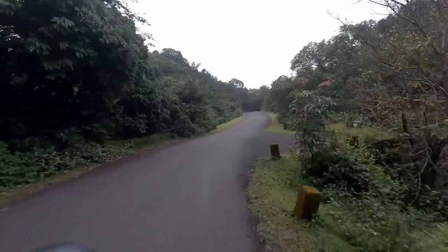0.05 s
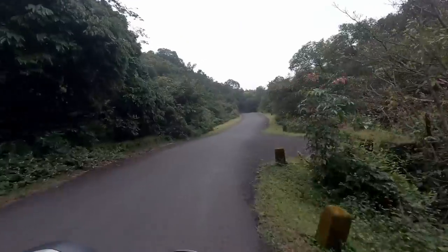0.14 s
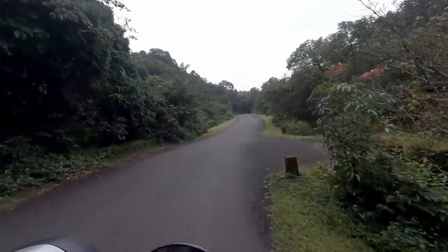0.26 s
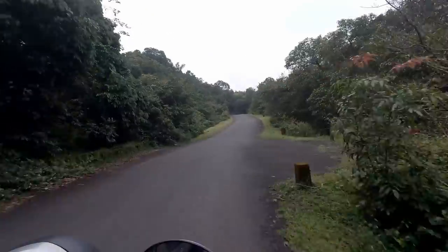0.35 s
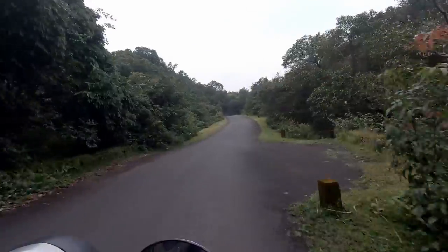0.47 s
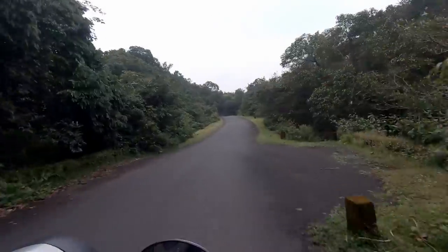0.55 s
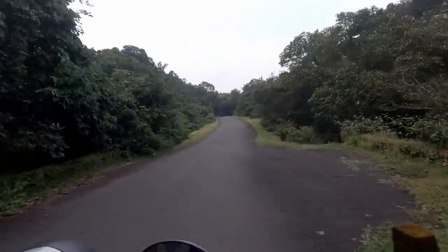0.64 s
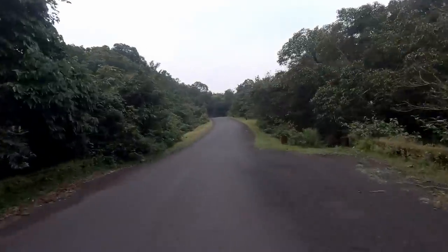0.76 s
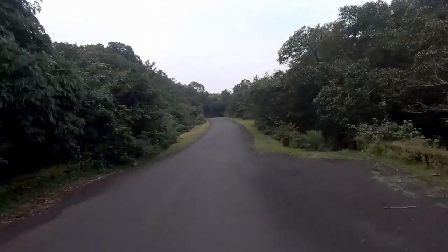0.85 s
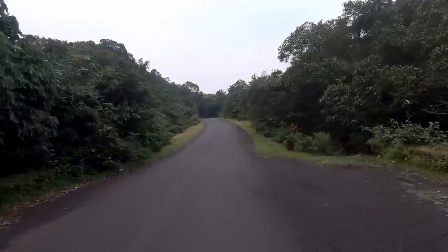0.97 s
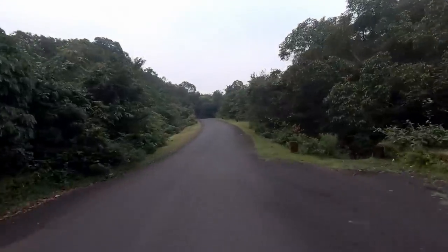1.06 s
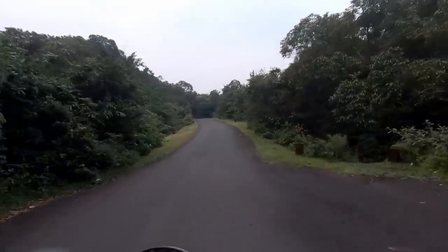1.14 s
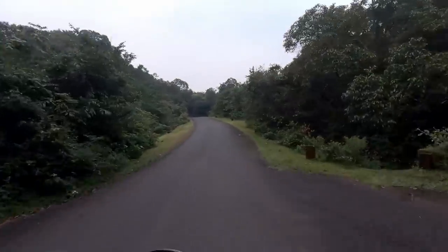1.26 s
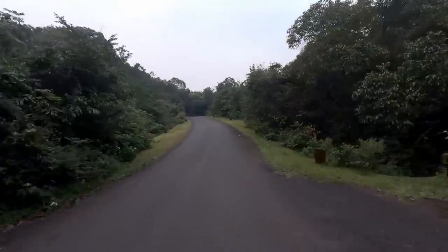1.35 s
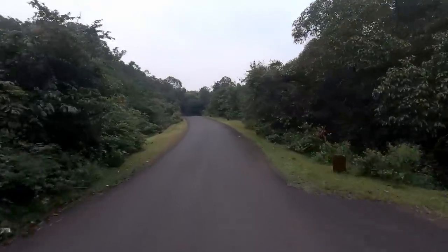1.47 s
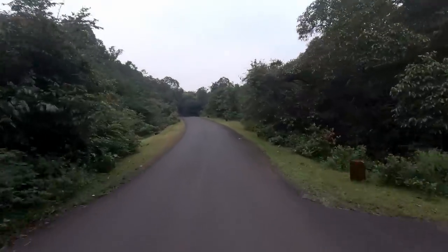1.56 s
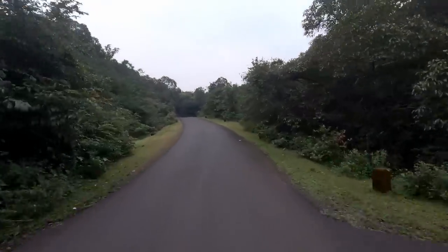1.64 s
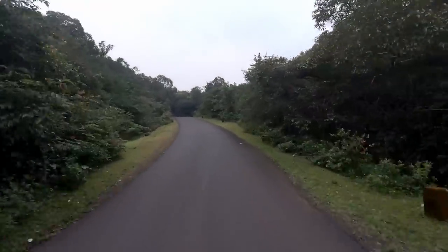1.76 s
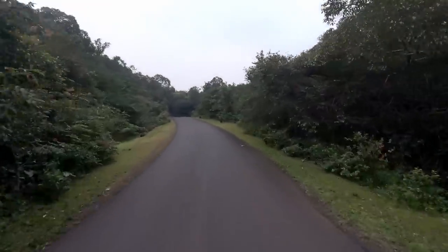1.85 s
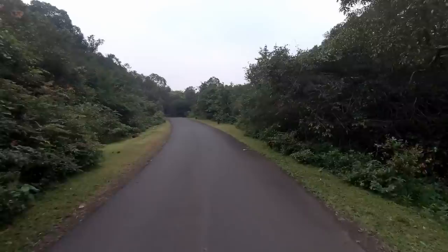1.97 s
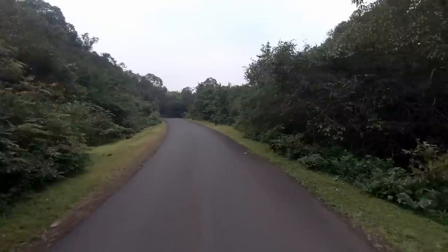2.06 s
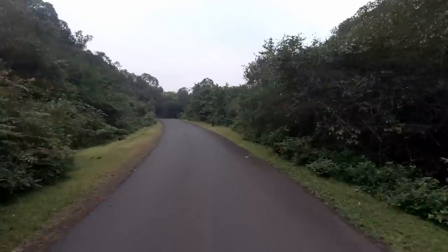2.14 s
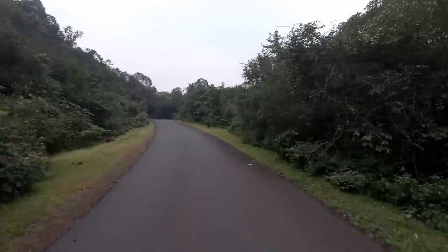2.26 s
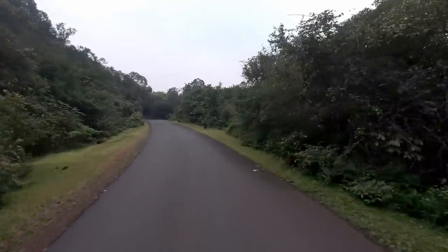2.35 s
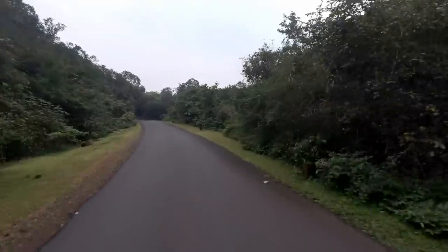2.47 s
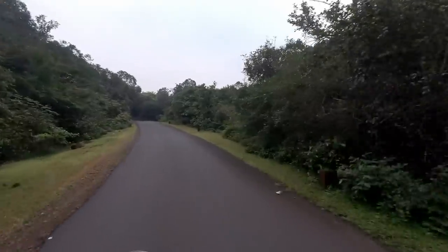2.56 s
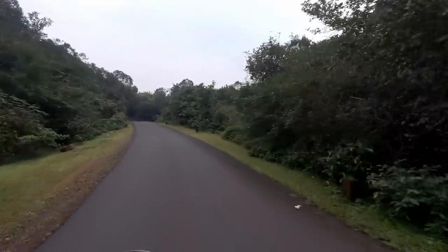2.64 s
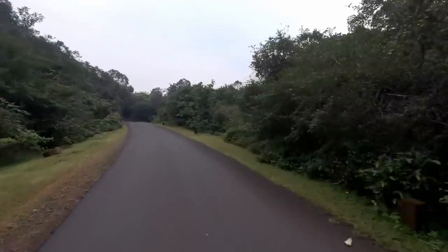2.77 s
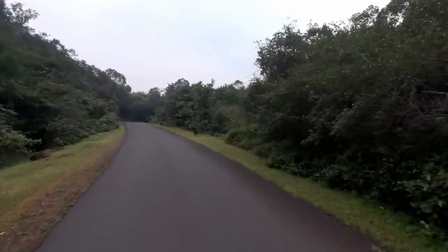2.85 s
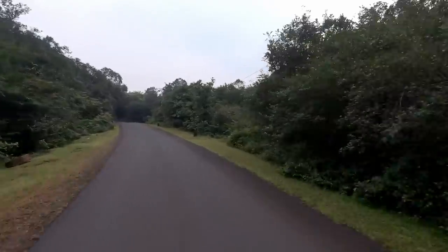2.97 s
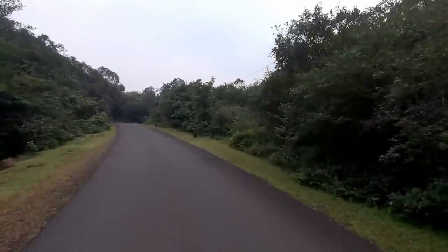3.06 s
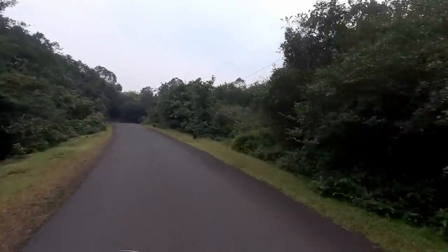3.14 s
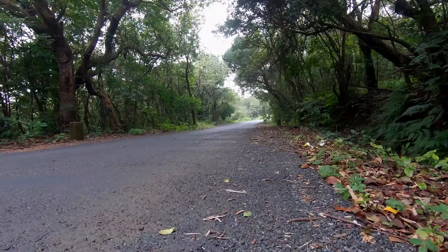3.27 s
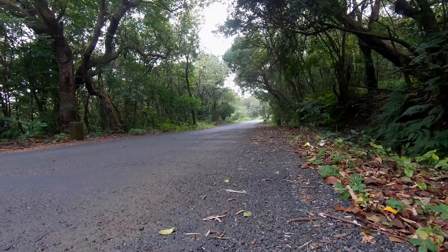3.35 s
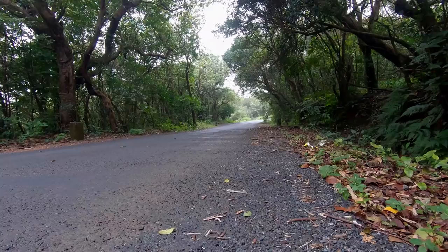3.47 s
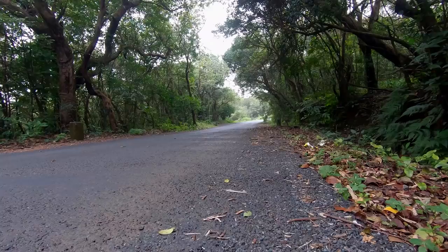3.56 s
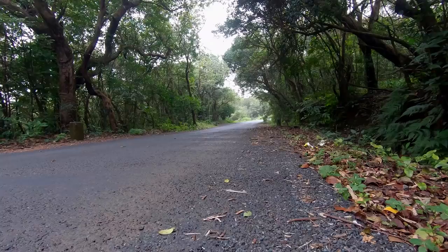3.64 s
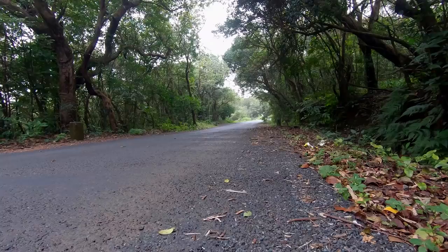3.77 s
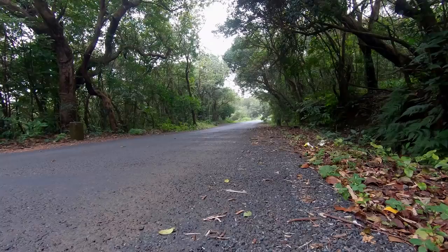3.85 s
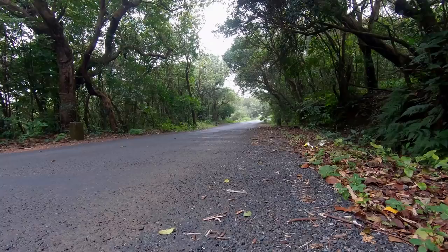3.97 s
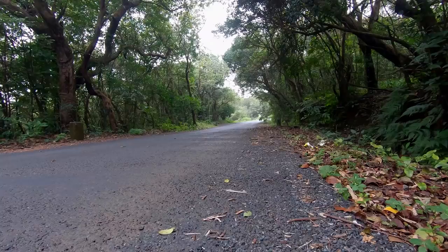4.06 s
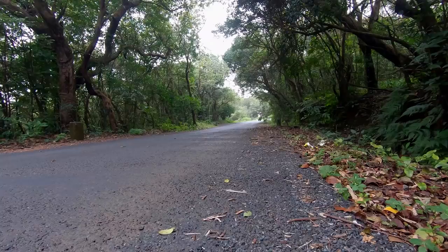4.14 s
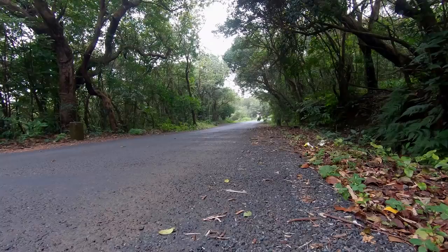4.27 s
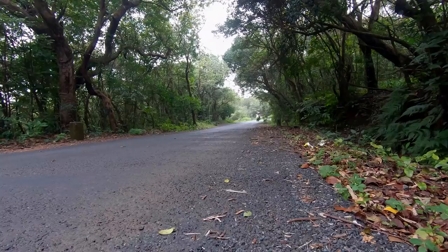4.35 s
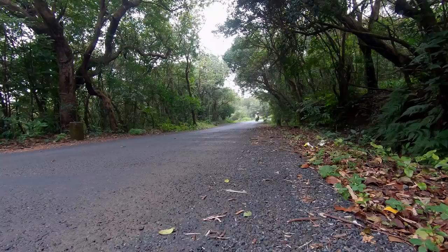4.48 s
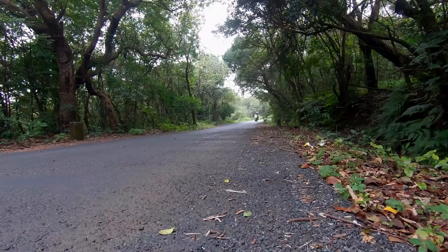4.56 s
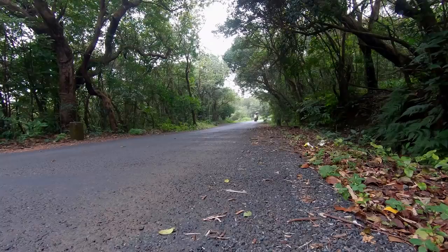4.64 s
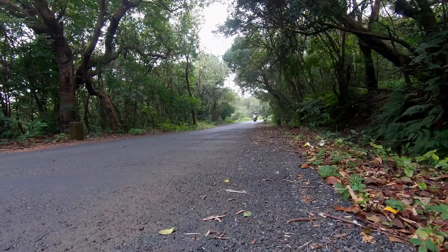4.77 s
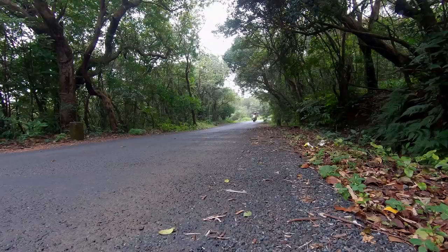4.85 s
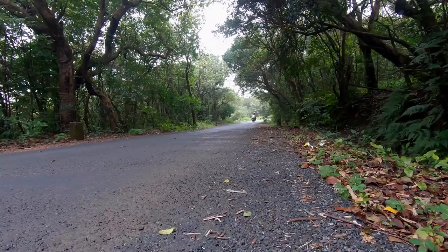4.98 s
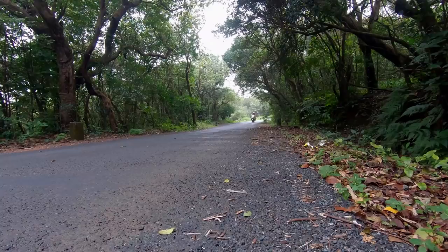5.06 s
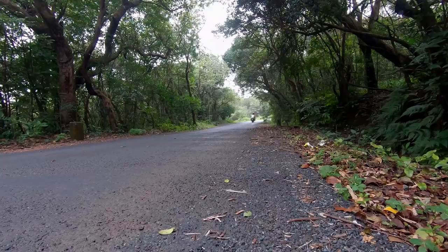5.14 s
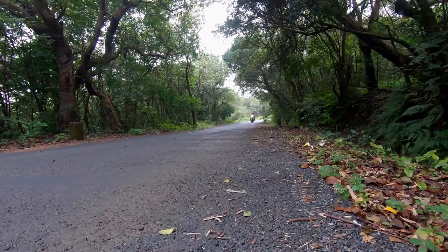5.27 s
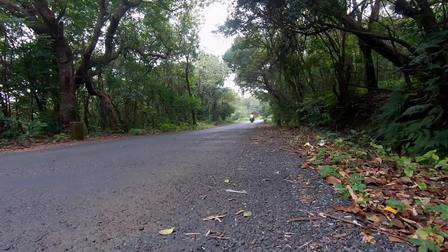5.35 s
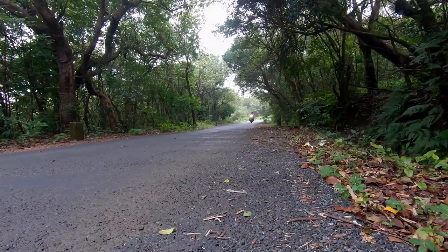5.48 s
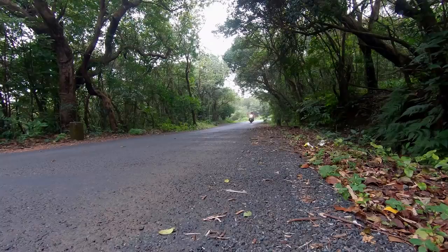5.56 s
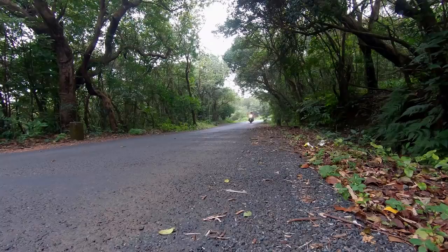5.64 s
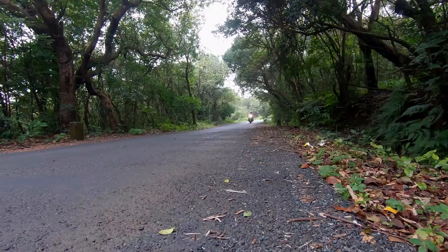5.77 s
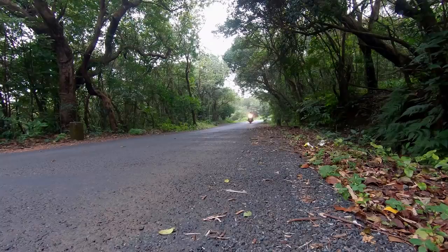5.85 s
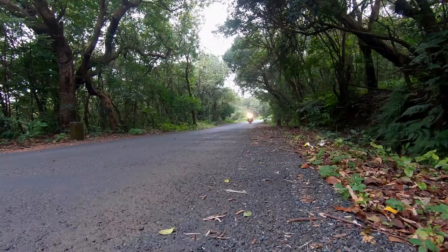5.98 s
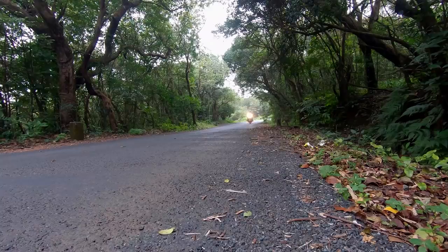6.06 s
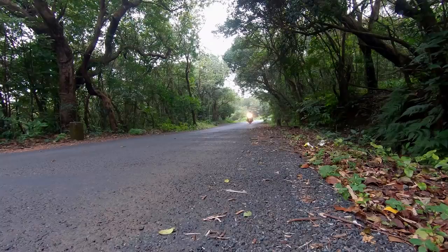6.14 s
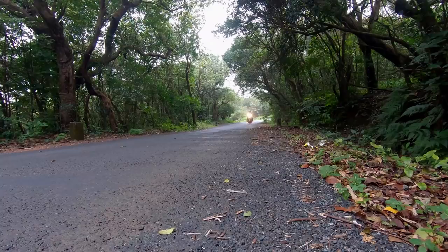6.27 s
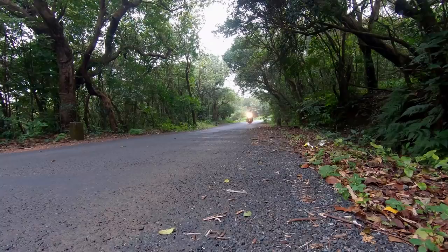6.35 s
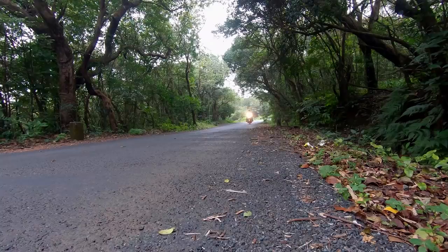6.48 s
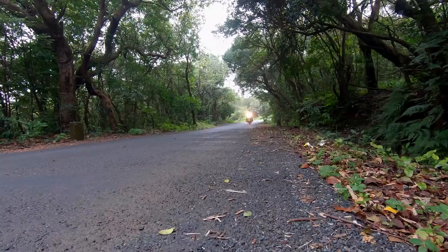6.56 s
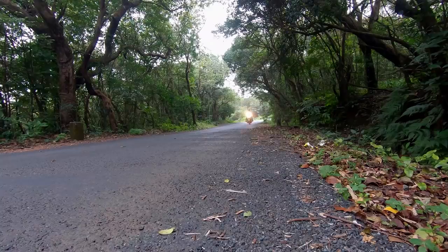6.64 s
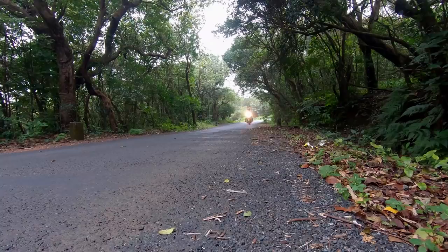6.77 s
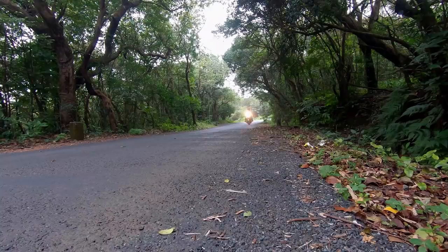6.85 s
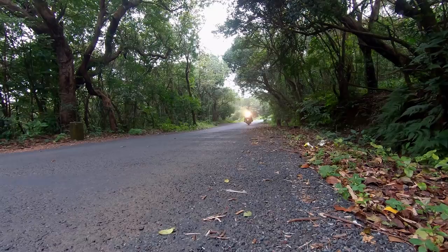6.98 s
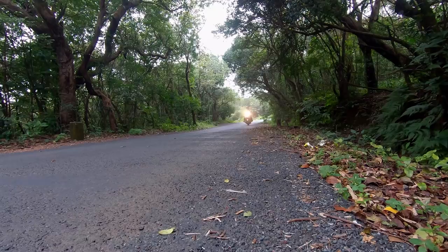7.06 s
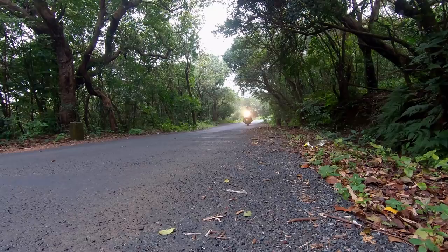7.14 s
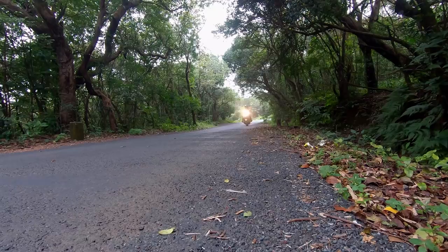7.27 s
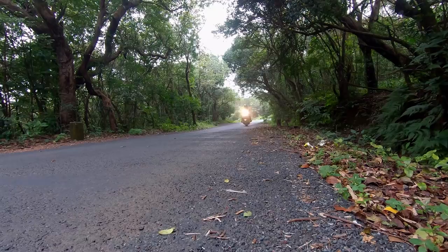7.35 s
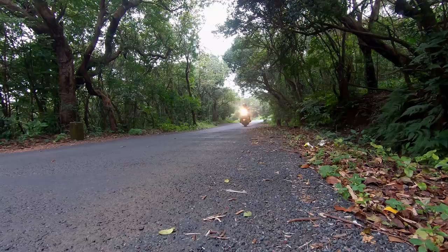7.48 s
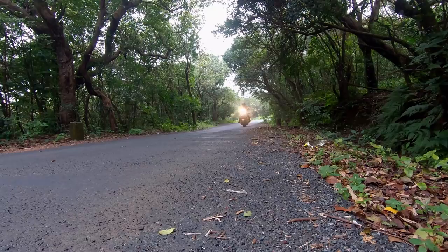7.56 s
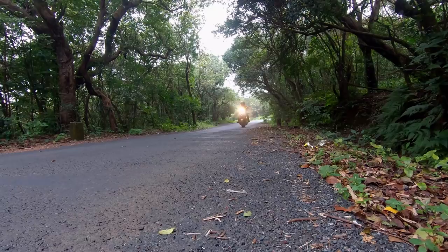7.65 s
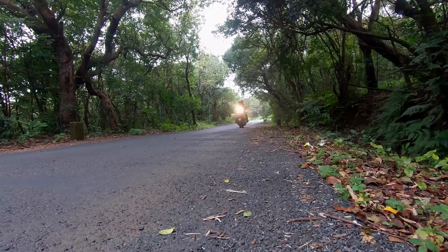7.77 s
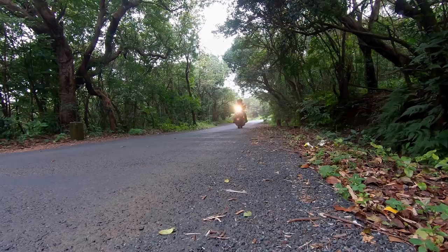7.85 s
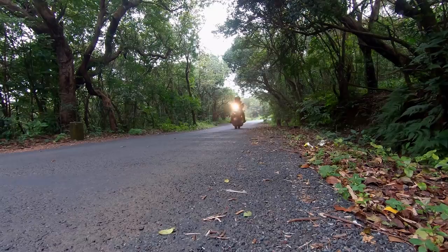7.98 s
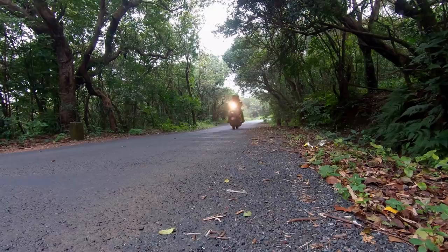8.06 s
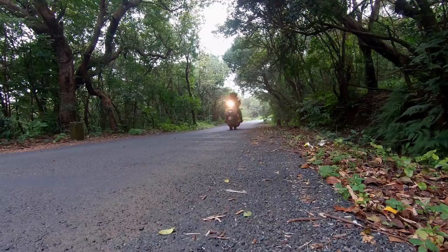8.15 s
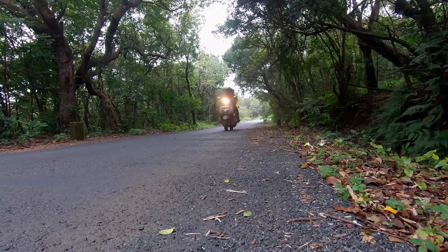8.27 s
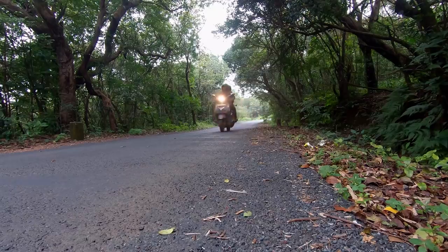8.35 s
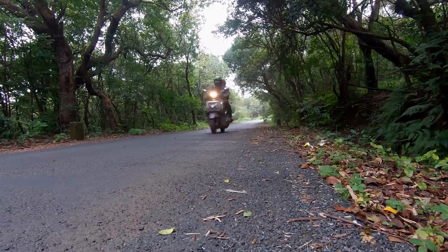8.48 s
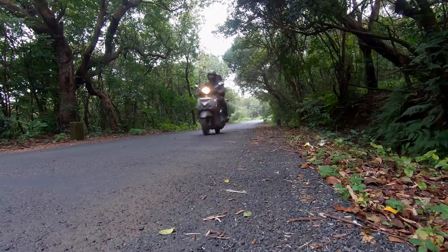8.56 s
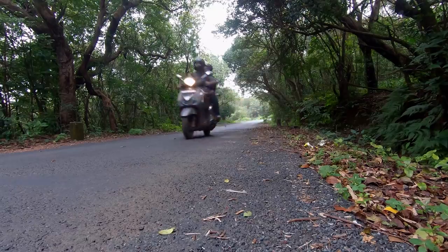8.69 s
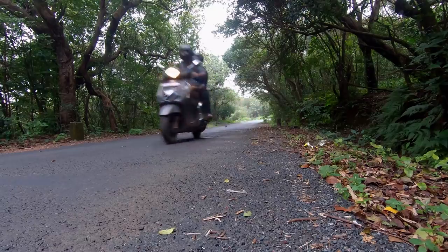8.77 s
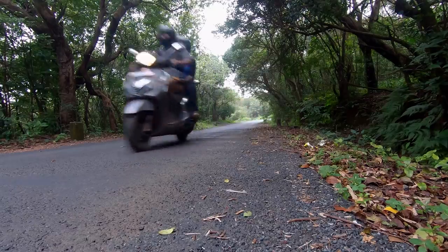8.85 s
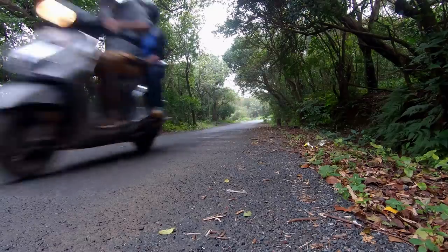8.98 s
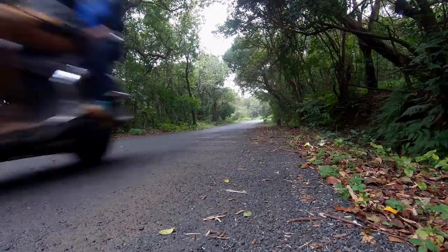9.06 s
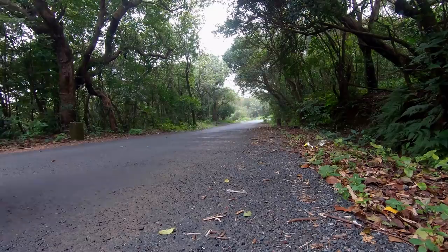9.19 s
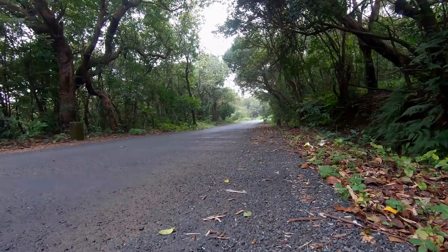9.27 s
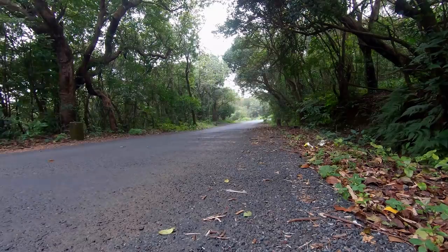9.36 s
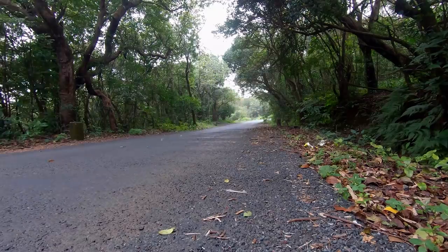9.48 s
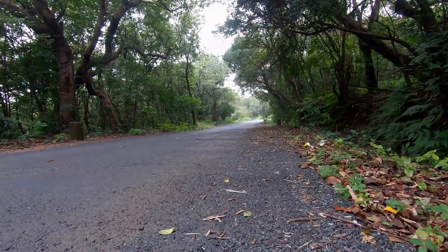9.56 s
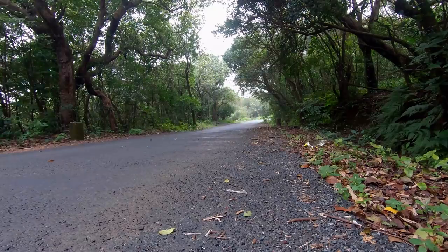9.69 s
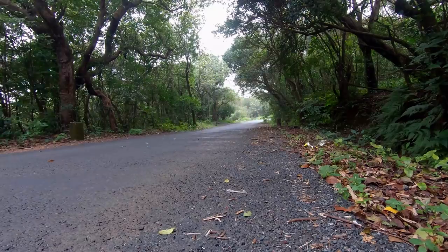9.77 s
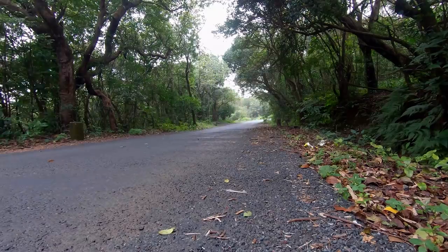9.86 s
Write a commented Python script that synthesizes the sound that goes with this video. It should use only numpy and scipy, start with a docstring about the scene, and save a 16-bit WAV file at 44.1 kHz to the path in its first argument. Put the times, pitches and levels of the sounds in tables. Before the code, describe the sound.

On board a small scooter on a forest road, a low throbbing engine drone, chain whine and wind buffeting the microphone. A hard cut to the quiet verge: faint insects, a distant hum slowly growing. The scooter passes very close on the left with a short tyre whoosh, its whine and revs falling into slow putts.

```python
"""A four-stroke scooter on a forest road: a drone at crank rate, exhaust overtones and cam chain whine.
First the microphone rides in the saddle, where dips break the drone and wind buffets the ports as shaped noise.
After a hard cut it stands on the verge: the scooter nears between the trees, shuts its throttle and rolls
by on the left, a metre or so off; whine and revs fall and the drone gives way to filtered impulses, the putts.
Tyre noise whooshes past; behind lie an insect chorus of narrow noise bands and brief swells of hiss."""
import sys
import numpy as np
from scipy import signal
from scipy.fft import rfft, irfft, next_fast_len
from scipy.io import wavfile
from scipy.ndimage import uniform_filter1d

SR = 44100
rng = np.random.default_rng(int(sys.argv[2]) if len(sys.argv) > 2 else 0)


def digitize_waveform(pressure):
    """Quantize a signal to 16-bit integers and store it at the path in sys.argv[1].

    Rows of a 2-D input are taken as channels; values are limited to [-1, 1].
    """
    field = np.atleast_2d(pressure).T
    bounded = np.clip(field, -1, 1)
    quanta = np.round(bounded * 32767).astype(np.int16)
    wavfile.write(sys.argv[1], SR, quanta)


N = 437472
T = np.arange(N) / SR  # time [s]
CUT_S = 3.259  # saddle to verge
TOP_HZ = 10800  # upper limit of the microphone channel

# engine speed in the saddle: (time [s], firing rate [Hz])
RIDE_SPEED = [(0, 34.52), (.3, 34.65), (.48, 34.94), (.6, 36.15), (.74, 36.58), (.91, 36.55), (1.16, 38.05),
              (1.42, 37.52), (1.65, 37.86), (1.88, 37.2), (2.24, 37.96), (2.57, 37.56), (3.25, 37.33)]
# engine in the saddle: (time [s], drone level [dB], overtones against the drone [dB], mechanical level [dB])
RIDE_LEVELS = [(0, -21, -5.5, -36), (.7, -16, -2, -35.5), (1.15, -19.5, -1, -36.5), (1.38, -18, -6, -35),
               (1.6, -19.5, 0.5, -36), (2.1, -19.5, 0.5, -36.5), (2.45, -21.5, 3.5, -34),
               (3.25, -20.5, 4.5, -34)]
# exhaust lines in the saddle: (multiple of firing rate [1], level at low revs [dB], level at cruising revs [dB])
RIDE_ORDERS = [(4, -20, -24), (5, -26, -28), (7, -29, -22.5), (8, -37, -35.5), (9, -26, -29.5),
               (10, -27.5, -29.5), (11, -24.5, -23.5), (12, -28.5, -34), (14, -36, -34.5), (15, -31, -33.5)]
# brief dips of the drone in the saddle: (time [s], depth [dB])
DRONE_DIPS = [(.01, 1), (0.301, -14), (.43, -1), (1.56, -15), (1.78, -14), (1.83, -12), (2.13, -10),
              (2.24, -9), (2.47, -2), (2.72, -9), (2.99, -19), (3.125, -16), (3.16, -21)]
# cam chain in the saddle, against the rush: (time [s], tooth rate [dB], its octave [dB], its third multiple [dB])
RIDE_CHAIN = [(0, -6, -13, -29), (.27, -7, -11, -30), (.5, -18, -10, -27), (.6, -13, -17, -24),
              (.78, -11, -22, -21), (.9, -12, -8, -22), (1.02, -14, -19, -15), (1.2, -5, -16, -25),
              (1.4, -12, -17, -18), (1.95, -14, -15.5, -22), (2.2, -8.5, -15, -24), (3.25, -12, -16, -25)]
# spectrum of the mechanical rush in the saddle: (frequency [Hz], relative level [dB])
RIDE_RUSH = [(120, -32), (250, -4), (400, -8.5), (540, -11), (867, -15.5), (1250, -9.5), (1600, -16.5),
             (2410, -17), (3150, -23), (3810, -23.5), (4900, -28.5), (5800, -39), (10000, -42.5),
             (11000, -77)]
# ringing engine covers: (frequency [Hz], width [Hz], relative level [dB])
COVERS = [(1060, 56, 4.5), (1310, 85, 4), (2340, 45, 4.5), (2450, 97, -5), (2710, 110, -11),
          (3780, 87, -14.5)]
# spectrum of steady wind at the microphone: (frequency [Hz], relative level [dB])
BUFFET = [(8, -21.5), (18, -36), (30, 8.5), (70, 1.5), (110, 4), (160, -9), (230, -13), (400, -30.5),
          (900, -73)]
# knocks of wind on the microphone: (time [s], peak level [dB], half length [s], reach [Hz])
GUSTS = [(0.045, -21.5, 0.021, 220), (0.405, -24.5, 0.028, 220), (.62, -26, .025, 130),
         (1.354, -21.5, .025, 200), (1.454, -25, 0.037, 260), (1.53, -23, 0.023, 150),
         (1.618, -23, 0.039, 160), (1.845, -22, 0.013, 420), (2.348, -25, 0.022, 258.8),
         (2.412, -21.5, 0.03, 149.8), (2.628, -24, .02, 200), (3.11, -31, 0.017, 449.5)]

# engine speed from the verge: (time [s], firing rate [Hz])
PASS_SPEED = [(3.26, 38.4), (3.65, 38.3), (4, 39.3), (4.4, 39.6), (5.6, 39.9), (7.7, 40.1), (8.6, 39.7),
              (8.8, 39), (8.93, 38.4), (9, 35.79), (9.07, 34.4), (9.2, 31.42), (9.42, 27.27), (9.53, 26),
              (9.75, 24.64), (9.92, 24.3)]
# the drone swells and fades between the trees: (time [s], level [dB])
PASS_DRONE = [(3.3, -38.5), (3.7, -39.5), (4.15, -36), (4.36, -39), (4.56, -35), (4.85, -36), (5.05, -34.5),
              (5.5, -37.5), (5.78, -32.5), (6.03, -35), (6.5, -30.5), (6.93, -31), (7.33, -27.5),
              (7.58, -30.5), (7.8, -26), (8.35, -26), (8.8, -21), (9.05, -24.5)]
# exhaust lines from the verge: (multiple of firing rate [1], level at low revs [dB], level at cruising revs [dB])
PASS_ORDERS = [(1, -31, -30), (3, -13, -17.5), (5, -26, -27), (6, -25, -30.5), (7, -19.5, -24.5),
               (8, -29, -27), (9, -30.5, -24), (10, -33, -27), (11, -31, -18.5), (13, -33, -28.5),
               (14, -38, -28)]
# silencer resonances: (frequency [Hz], width [Hz], relative level [dB])
SILENCER = [(50, 30, -4), (78, 110, 1), (128, 50, -3.5), (213, 21, 0), (320, 33, -11), (388, 25, -9)]
# tail pipe resonances that round each thump: (frequency [Hz], width [Hz], relative level [dB])
TAILPIPE = [(25, 25, -5), (104, 114, 7), (388, 130, -13)]
# resonances of the gas puffed out with each putt: (frequency [Hz], width [Hz], relative level [dB])
PUFF = [(130, 66, -3), (321, 30, -0.5), (383, 24, -7)]
# silencer shell resonances: (frequency [Hz], width [Hz], relative level [dB])
BOOM = [(200, 18, -3.5), (406.5, 15, 1.5)]
# the chain's octave carries down the road in spells: (time [s], level against the rush [dB])
PASS_OCTAVE = [(3.7, -22), (3.87, -11), (4.45, -7), (4.6, -12), (4.9, -10.5), (5.3, -14.5), (8.4, -15),
               (8.65, -13), (8.93, -11), (9, -14), (9.08, -9), (9.14, -15), (9.25, -16)]
# spectrum far up the road: (frequency [Hz], relative level [dB])
FAR = [(110, -52), (190, -8), (207, -2), (249, -5.5), (300, -5.5), (375, -1.5), (435, -2.5), (473, -4.5),
       (686, -15.5), (1030, -22.5), (1240, -18.5), (2160, -19.5), (2790, -18.5), (5570, -30.5), (7950, -26),
       (10800, -38.5), (14000, -75), (22000, -120)]
# spectrum alongside: (frequency [Hz], relative level [dB])
NEAR = [(110, -53), (190, -0.5), (250, -7.5), (320, -4), (400, -1.5), (473, -10.5), (641, -12.5),
        (884, -12.5), (1200, -13), (1570, -21), (1770, -19), (3410, -23), (5860, -46), (8940, -41.5),
        (10800, -51.5), (14000, -75), (22000, -120)]
# scatter from the trees: (frequency [Hz], side minus mid [dB])
SCATTER = [(200, -27), (550, -15.5), (1000, -5), (3300, -11.5), (5800, -2), (10000, 1.5)]
# each wheel going by: (time [s], level [dB], half length [s])
WHEELS = [(9.166, -31.5, 0.13), (9.323, -38, 0.15)]
# spectrum of the tyre whoosh: (frequency [Hz], relative level [dB])
WHOOSH = [(500, -34), (850, -21), (1100, 6.5), (1550, 7), (2000, -2), (2700, -11.5), (3600, -14),
          (5200, -17), (8000, -41), (12000, -48)]
# tread tones within the whoosh: (frequency [Hz], width [Hz], relative level [dB])
TREAD = [(1120, 60, 3), (1550, 70, 2.5), (3380, 300, -9)]
# the bend and the trees alter the level on approach: (time [s], change [dB])
SCREEN = [(3.3, -4.5), (4.2, -2), (4.7, 0.5), (5.7, 1), (6.5, -1.5), (7.3, 1), (7.85, -0.9), (8.6, 0.5),
          (9.1, -0.5)]
# How each part carries, one row each: (level at the nearest point before screening [dB], nearest distance [m],
# loss per doubling of distance [dB], further loss per metre [dB/m], negative for a gain)
SHELL_PATH = (-25.5, 1.19, 4, 0.18)
RUSH_PATH = (-28, 1.86, 5, 0.0528)
TYRE_PATH = (-43, 1.9, 2.5, 0.38)
RUMBLE_PATH = (-30, 3, 7.5, 0.7)
PUTT_PATH = (-21, 0.7, 4, -0.25)

# insect chorus: (lowest [Hz], highest [Hz], level [dB], drop as it breaks off [dB], fade after that [dB/s])
INSECTS = [(3880, 4330, -65, 12, 4), (4450, 4680, -69, 12, 4), (5900, 6800, -70, 0, 1)]
# brief swells of hiss, like stirring leaves: (time [s], peak level [dB], half length [s])
RUSTLES = [(2.4, -68, .018), (2.5, -72, 0.016), (3.77, -68, .05), (4.22, -75, .05), (4.66, -71, .05),
           (5.7, -61, .12)]
# spectrum of those swells: (frequency [Hz], relative level [dB])
RUSTLE = [(3000, -30), (4800, -7), (6200, 5), (7500, -4), (10000, -17)]
# microphone port response: (frequency [Hz], gain [dB])
PORT = [(3600, 0.5), (4200, 0), (5000, -2), (5700, -1.5), (6400, -1.5), (6850, 1), (7500, -2.5)]

DIP_S = 0.011  # half length of a drone dip
WIND_DB, WIND_SWING_DB, EDDIES_PER_S = -24, 1.5, 20  # steady buffeting before the dips
RIDE_REVS_HZ, PASS_REVS_HZ = (36.7, 37.3), (38.15, 39.9)  # firing rates that count as low and as cruising
SPEED_M_S = 9  # road speed
WHEELS_S, ENGINE_S, TAIL_S = 9.18, 9.2, 9.344  # when each part draws level with the microphone
OCTAVE_DB, OCTAVE_NEAR_DB = -18.5, 6  # the drone's octave against the drone, and its rise close by
SHUT_S, SHUT_FADE_S = 9.14, 0.057  # the throttle closes
PUTTS_S, PUTTS_FADE_S = 9.18, 0.083  # the putts emerge as the tail pipe comes round
LOADED_PUTTS = 0.4  # gain of the putts close by before that
PUFF_DB, PUFF_DECAY = -9, 0.65  # puff against thump; decay in engine cycles
BOOM_DB, BOOM_S, BOOM_HALF_S = -24.5, 9.3, 0.13  # shell boom: peak level, moment, half length
COAST_DB, COAST_S, COAST_FADE_S = -7, 9.52, 0.06  # the shell roar dies down as the engine slows
TAUT_SLACK, LOOSE_SLACK = 0.0015, 0.0025  # chain play under load, and extra as load comes off [cycles]
LOOSE_S, LOOSE_FADE_S = 8.3, 0.103  # when the load comes off
TOOTH_DB = (-18, -14.5)  # tooth rate against the rush, from ahead and from behind
TOOTH_NEAR_DB, TOOTH_NEAR_S = 9, 0.25  # the chain sounds direct alongside: lift and half length
THIRD_DB = -17  # three times the tooth rate, heard only alongside
CASE_HZ, CASE_WIDTH_HZ, CASE_DB = 902, 37, 7  # chain case resonance that the falling whine sweeps through
LEFT_SHARE, LEFT_S = 0.66, 0.2  # lean to the left alongside, and its half length
GRIT_HZ, GRIT_DB, GRIT_S, GRIT_HALF_S = (2600, 5600), -35.5, 9.207, .014  # grit under the front tyre
CHORUS_S, CHORUS_FADE_S = 3.83, .03  # when the insect chorus breaks off


def saddle():
    """On board: drone, covers rattled by the valve gear, chain whine and wind on the microphone."""
    drone_db, overtone_db, mechanical_db = curves(RIDE_LEVELS)
    turns = cycles(RIDE_SPEED, wobble=0.00199)
    dips = undb(sum(db * np.exp(-((T - s) / DIP_S) ** 2) for s, db in DRONE_DIPS))
    drone = line(turns, 2, 0.11, 30.05) * dips
    upper = overtones(turns, RIDE_ORDERS, RIDE_REVS_HZ, flutter=0.15) * undb(overtone_db)
    engine = (drone + upper) * undb(drone_db)
    rush = colour(noise(), RIDE_RUSH)
    rush = rush / np.std(band(rush, 700, 5000))
    rush = rush * beat(turns, depth=0.38, decay=.2) * undb(.5 * walk(9.7))
    covers = unit(ring(noise() * beat(turns, depth=0.58, decay=.2), COVERS))
    machine = undb(-2.5) * rush + undb(-10) * covers + saddle_chain(turns)
    wind = unit(colour(noise() * undb(WIND_SWING_DB * walk(EDDIES_PER_S)), BUFFET)) * undb(WIND_DB)
    wind = wind * np.sqrt(dips)  # dips along with the drone, by half as many dB
    # air flow differs a little between the two ports
    side = unit(colour(noise(), [(100, -20), (1000, -9), (3000, -3.5), (10000, 5)])) * undb(-74.5)
    return engine + machine * undb(mechanical_db) + wind + np.array([side, -side])


def saddle_chain(turns):
    """The cam chain meets 34 teeth per engine cycle, sounding that rate, its octave and third multiple."""
    tooth_db, octave_db, third_db = curves(RIDE_CHAIN)
    octave = undb(octave_db) * chain_line(turns, 68, 0.38, 120, slack=0.0013)
    tooth = undb(tooth_db) * chain_line(turns, 34, 0.42, 110, slack=0.002)
    third = undb(third_db) * chain_line(turns, 102, 0.47, 50)
    return (tooth + octave + third) * beat(turns, depth=0.83, decay=.3)  # each firing tugs the chain


def verge(near_s=0.9, last_firing_s=9.884):
    """The scooter nears under load, then shuts off and rolls past on the left."""
    turns = cycles(PASS_SPEED, wobble=0.00119)
    turns = turns - np.interp(last_firing_s, T, turns)
    # from afar the ground swallows the middle range; alongside it fills in
    near = alongside(near_s)
    shell, rush, hiss = np.sqrt(1 - near) * road_noise(FAR) + np.sqrt(near) * road_noise(NEAR)
    shell = shell * beat(turns, depth=0.66, decay=0.11) * undb(2.05 * walk(14)) * carried(SHELL_PATH, TAIL_S)
    shell = shell * undb(COAST_DB * step(COAST_S, COAST_FADE_S)) + boom(turns)
    covers = unit(ring(noise(), [(1224, 130, 3.0), (2673, 140, -1.5), (3690, 550, -7)]))
    rush = doppler(undb(-1.5) * rush + undb(-9.5) * covers, WHEELS_S, SPEED_M_S, miss_m=1.3)
    rush = rush * beat(2 * turns, depth=0.3, decay=.25)  # pulses once per crank turn
    machine = (rush + whine(turns)) * undb(.5 * walk(14)) * carried(RUSH_PATH, ENGINE_S)
    whoosh = sum(wheel(*row) for row in WHEELS) + grit()
    tyres = hiss * undb(.5 * walk(17)) * carried(TYRE_PATH, TAIL_S)
    # the camera body shades the middle range from the right port
    left = LEFT_SHARE * alongside(LEFT_S)
    leaning = (machine + whoosh) * np.array([1 + left, 1 - left])
    return exhaust(turns, near) + shell + leaning + tyres + rumble() + insects()


def exhaust(turns, near):
    """Under load a drone at crank rate, twice the firing rate; with the throttle shut only putts."""
    shut, exposed = step(SHUT_S, SHUT_FADE_S), step(PUTTS_S, PUTTS_FADE_S)
    octave = line(turns, 4, 0.11, 9) * undb(OCTAVE_DB + OCTAVE_NEAR_DB * near)
    drone = line(turns, 2, 0.089, 11) + octave
    upper = overtones(turns, PASS_ORDERS, PASS_REVS_HZ, flutter=0.16)
    loaded = (drone + upper) * undb(curves(PASS_DRONE)[0])
    putt_gain = exposed + LOADED_PUTTS * near * (1 - exposed)
    bass = loaded * (1 - shut) + putts(turns) * putt_gain
    # it reaches the two ports slightly out of step
    skew = undb(-24.5) * filtered(bass, lambda f: 1j)
    return bass + np.array([skew, -skew])


def overtones(turns, orders, revs_hz, flutter):
    """Exhaust lines whose balance shifts with the revs; each flutters by itself, the higher ones more."""
    firing_hz = uniform_filter1d(np.gradient(turns), SR // 4) * SR
    return sum(undb(np.interp(firing_hz, revs_hz, dbs)) * line(turns, order, flutter * np.sqrt(order), 13)
               for order, *dbs in orders)


def putts(turns):
    """Each firing thumps through silencer and tail pipe with uneven force, trailing a rough puff of gas."""
    fired = np.diff(np.floor(turns), prepend=np.floor(turns[0]))
    thumps = ring(ring(fired * undb(0.72 * walk(30)), SILENCER), TAILPIPE)
    thumps = unit(colour(thumps, [(12, -12), (25, 2), (50, 9.5), (100, 8.5), (200, -2), (420, -15),
                                  (600, -22), (2000, -52)]))
    puffs = band(noise(), 54, 480) * np.exp(-(turns % 1) / PUFF_DECAY)
    puffs = unit(ring(puffs, PUFF))
    return (thumps + undb(PUFF_DB) * puffs) * carried(PUTT_PATH, TAIL_S)


def boom(turns):
    """Each firing shakes the silencer shell; the boom swells side on, and its pitch falls as it passes."""
    shaken = unit(ring(noise() * beat(turns, depth=3.1, decay=0.26), BOOM))
    passing = doppler([shaken], BOOM_S, SPEED_M_S, miss_m=0.8)
    return passing * undb(BOOM_DB) / (1 + ((T - BOOM_S) / BOOM_HALF_S) ** 4)


def whine(turns, turn_s=0.053):
    """The cam sprocket's 34 teeth meet the chain: the octave carries forward, the tooth rate backward."""
    behind, loose = step(ENGINE_S, turn_s), step(LOOSE_S, LOOSE_FADE_S)
    slack = TAUT_SLACK + LOOSE_SLACK * loose
    tooth_hz = 34 * curves(PASS_SPEED)[0]
    tooth_db = np.interp(behind, [0, 1], TOOTH_DB) + TOOTH_NEAR_DB * alongside(TOOTH_NEAR_S)
    tooth_db = tooth_db + CASE_DB / (1 + ((tooth_hz - CASE_HZ) / CASE_WIDTH_HZ) ** 2)
    octave = chain_line(turns, 68, 0.47, 130, slack=slack) * undb(curves(PASS_OCTAVE)[0])
    third = chain_line(turns, 102, 0.6, 50) * undb(THIRD_DB) * alongside(TOOTH_NEAR_S)
    chain = chain_line(turns, 34, 0.44, 130, slack=slack) * undb(tooth_db) + octave + third
    return chain * beat(turns, depth=0.87 * loose, decay=0.25)


def chain_line(turns, order, flutter, rate, slack=0.0021):
    """A chain tone: slack makes the teeth land early or late, which blurs the higher orders most."""
    return line(turns + slack * walk(50), order, flutter, rate)


def cycles(speed, wobble):
    """Count of engine cycles, one firing each; the speed hunts a little."""
    return np.cumsum(curves(speed)[0] * (1 + wobble * walk(14))) / SR


def line(turns, order, flutter, rate):
    """One engine order whose strength and phase flutter."""
    angle = 2 * np.pi * (order * turns + rng.random())
    steady = (1 + flutter * walk(rate)) * np.sin(angle)
    quadrature = flutter * walk(rate) * np.cos(angle)
    return np.sqrt(2 / (1 + 2 * flutter ** 2)) * (steady + quadrature)


def beat(turns, depth, decay):
    """Gain of rms 1 that jumps at each whole count of turns and dies away within it."""
    return unit(1 + depth * np.exp(-(turns % 1) / decay))


def road_noise(spectrum):
    """Shell roar, mechanical rush and tyre hiss as three stereo noise bands; the trees scatter the treble most."""
    mid = colour(noise(), spectrum)
    side = colour(colour(noise(), spectrum), SCATTER)
    stereo = np.array([mid + side, mid - side])
    parts = [band(stereo, lo, hi) for lo, hi in [(170, 640), (640, 4800), (4800, 13000)]]
    return np.array([p / np.std(p.mean(axis=0)) for p in parts])


def wheel(at_s, db, half_s):
    """One tyre's whoosh, roughened by grit; the tread's song falls as it goes by."""
    whoosh = unit(colour(noise(), WHOOSH)) + undb(-3.5) * unit(ring(noise(), TREAD))
    whoosh = doppler([whoosh], at_s, SPEED_M_S, miss_m=1.0)[0]
    return whoosh * undb(db + 2.2 * walk(140)) / (1 + ((T - at_s) / half_s) ** 2)


def grit():
    """Loose grit crunches as the front tyre passes: a brief burst of uneven band noise."""
    grains = unit(band(noise() * undb(4 * walk(190)), *GRIT_HZ))
    return grains * undb(GRIT_DB) * np.exp(-((T - GRIT_S) / GRIT_HALF_S) ** 2)


def rumble():
    """Low air rumble around the scooter and in its wake, as shaped noise."""
    air = colour(noise(), [(10, -12), (30, 7.5), (120, -2.5), (220, 2.0), (400, -36.0)])
    return unit(air) * carried(RUMBLE_PATH, ENGINE_S)


def carried(path, level_s):
    """Gain of a passing source: spreading, a further change per metre, and the bend and trees."""
    db, miss_m, doubling_db, metre_db = path
    distance = np.hypot(SPEED_M_S * (T - level_s), miss_m)
    spreading_db = doubling_db * np.log2(distance / miss_m)
    further_db = metre_db * (distance - miss_m)
    return undb(db - spreading_db - further_db + curves(SCREEN)[0])


def doppler(x, closest_s, speed_m_s, miss_m):
    """A moving source is heard after its travel time, so its pitch falls as it passes."""
    distance = np.hypot(speed_m_s * (T - closest_s), miss_m)
    emitted = T - distance / 343  # speed of sound [m/s]
    return np.array([np.interp(emitted, T, channel) for channel in x])


def alongside(half_s):
    """1 as the tail draws level with the microphone, near 0 long before and after."""
    return 1 / (1 + ((T - TAIL_S) / half_s) ** 4)


def gusts():
    """Eddies slap the port: short puffs that reach higher than the steady buffeting."""
    air = colour(noise(), [(15, -16), (45, 0.0), (120, 4.5), (250, -3.5), (800, -2.0), (1500, -18), (4000, -25)])

    def puff(reach_hz):
        return unit(filtered(air, lambda f: 1 / (1 + (f / reach_hz) ** 2)))

    return sum(puff(reach_hz) * undb(db) * np.exp(-((T - s) / half_s) ** 2)
               for s, db, half_s, reach_hz in GUSTS)


def insects():
    """A far chorus in the trees, each kind shrilling in its own noise band; the highest lingers."""
    since = np.maximum(T - CHORUS_S, 0)
    broken_off = step(CHORUS_S, CHORUS_FADE_S)

    def port():
        return sum(undb(db - drop_db * broken_off - fade_db * since + walk(27)) * unit(band(noise(), lo, hi))
                   for lo, hi, db, drop_db, fade_db in INSECTS)

    return np.array([port(), port()])


def rustles():
    """Soft, grainy swells of hiss, from separate noise at each port."""
    swell = sum(undb(db) * np.exp(-((T - s) / half_s) ** 2) for s, db, half_s in RUSTLES)
    return np.array([unit(colour(noise() * undb(3 * walk(150)), RUSTLE)) for _ in range(2)]) * swell


def undb(db):
    """Decibels to gain."""
    return 10 ** (np.asarray(db) / 20)


def unit(x):
    """Scale to rms 1."""
    return x / np.sqrt(np.mean(x ** 2))


def curves(table):
    """The columns of a table as piecewise linear controls over time."""
    s, *columns = np.transpose(table)
    return [np.interp(T, s, c) for c in columns]


def step(at_s, fade_s):
    """A smooth change from 0 to 1."""
    return .5 + .5 * np.tanh((T - at_s) / (2 * fade_s))


def walk(rate):
    """Slow chance with a spread near 1: straight lines between random values, rate of them per second."""
    steps = rng.standard_normal(2048)
    return 1.12 * np.interp(T * rate, np.arange(len(steps)), steps)


def noise():
    """White noise."""
    return rng.standard_normal(N)


def filtered(x, response):
    """Apply a response given as a function of frequency."""
    size = next_fast_len(N + SR // 4, True)
    hz = np.maximum(np.fft.rfftfreq(size, 1 / SR), 1)
    return irfft(rfft(x, size) * response(hz), size)[:N]


def colour(x, points):
    """Shape by a spectrum of (frequency [Hz], level [dB]) points."""
    hz, db = np.transpose(points)
    return filtered(x, lambda f: undb(np.interp(np.log(f), np.log(hz), db)))


def ring(x, modes):
    """Drive a set of resonances (frequency [Hz], width [Hz], level [dB])."""
    def response(f):
        return sum(undb(db) / (1 + 1j * (f * f - hz * hz) / (f * width)) for hz, width, db in modes)

    return filtered(x, response)


def band(x, lo_hz, hi_hz):
    """Steep band-pass."""
    edges = [lo_hz, min(hi_hz, SR / 2 - 100)]
    return signal.sosfilt(signal.butter(5, edges, "band", fs=SR, output="sos"), x)


def scene():
    """Saddle, then verge, joined by a hard cut; the rustles run across both."""
    riding = np.clip((CUT_S - T) * 1000, 0, 1)
    return riding * (saddle() + gusts()) + (1 - riding) * verge() + rustles()


def record(dry):
    """The microphone port colours the treble and the camera cuts the top."""
    heard = np.array([colour(channel, PORT) for channel in dry])
    return signal.sosfilt(signal.ellip(8, .2, 50, TOP_HZ, fs=SR, output="sos"), heard)


dry = scene()
out = record(dry)
digitize_waveform(out)
```